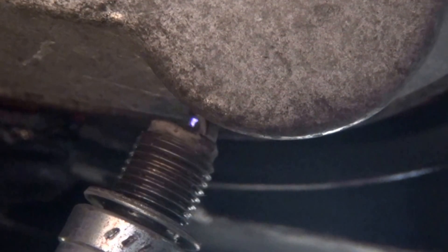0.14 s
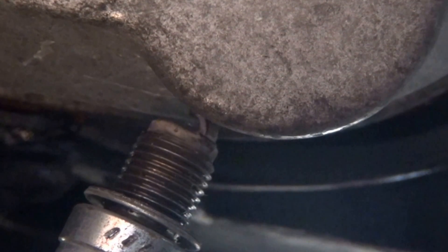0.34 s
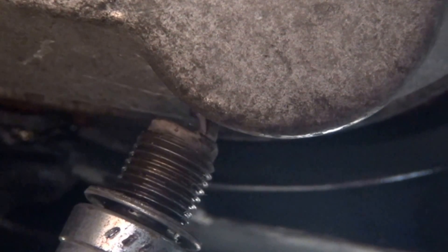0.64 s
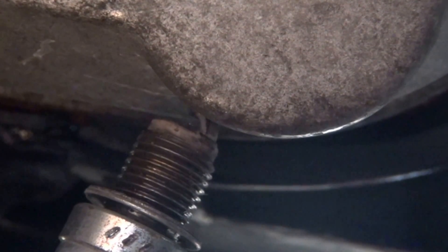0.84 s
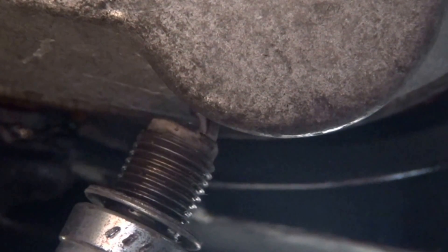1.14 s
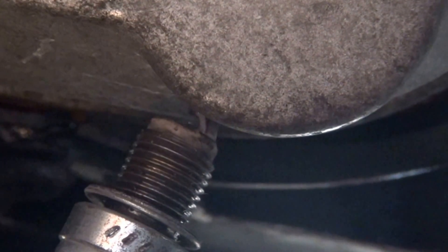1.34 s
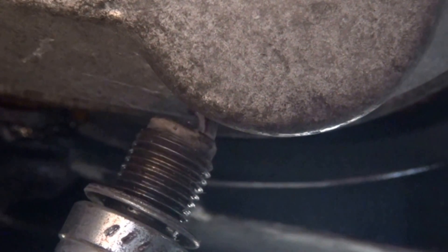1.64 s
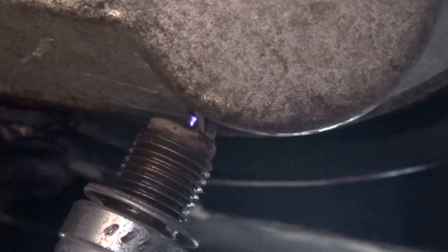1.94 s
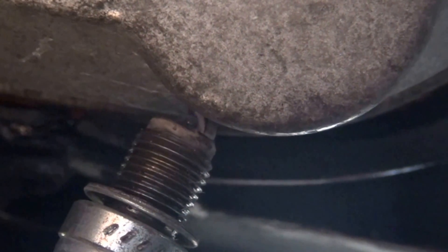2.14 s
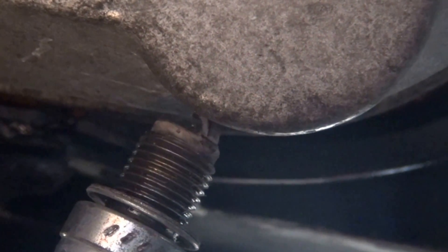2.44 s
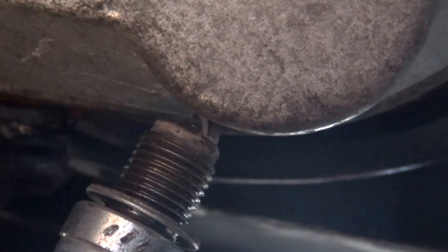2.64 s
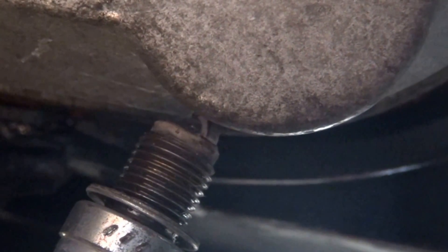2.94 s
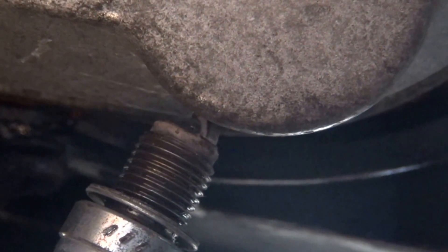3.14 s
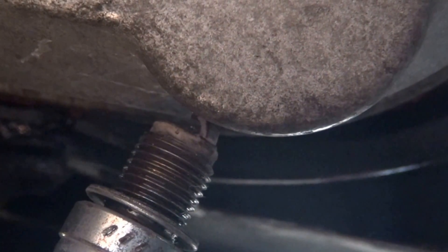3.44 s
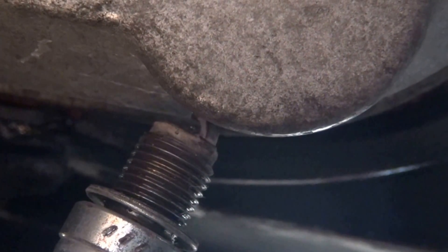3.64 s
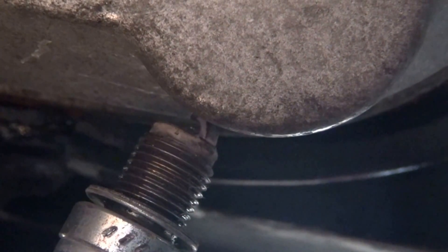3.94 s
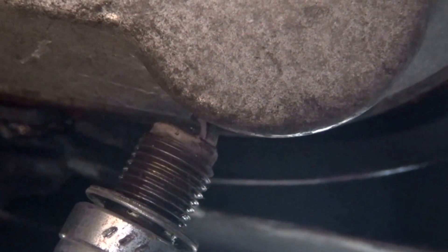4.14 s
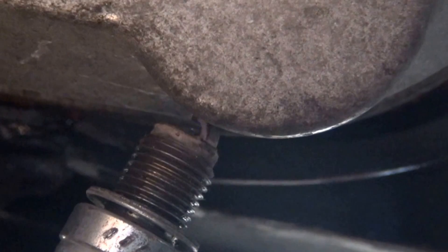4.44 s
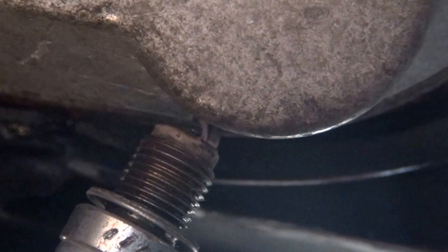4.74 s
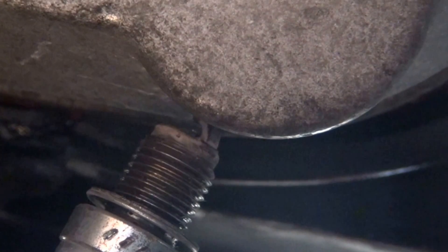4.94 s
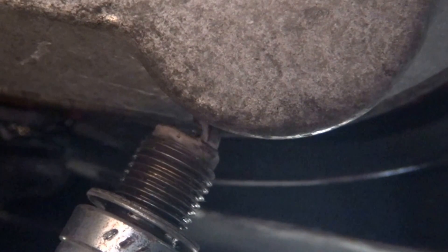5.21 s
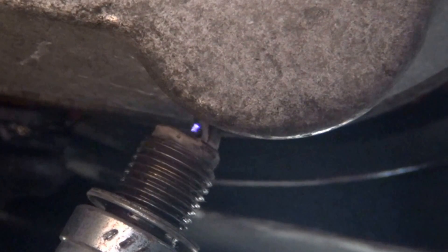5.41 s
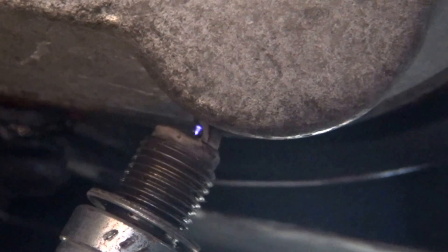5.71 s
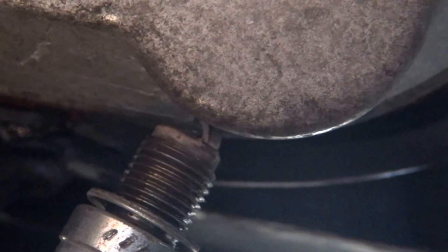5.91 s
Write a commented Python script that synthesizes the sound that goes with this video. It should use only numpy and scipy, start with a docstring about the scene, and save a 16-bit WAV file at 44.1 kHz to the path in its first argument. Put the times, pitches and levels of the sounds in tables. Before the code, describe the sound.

Close by, a starter motor whines up and grinds, an open cylinder puffs steadily, and loose gears clatter to rest, three times over faint distant traffic.

```python
"""An electric starter cranks a small engine with its spark plug out, three bursts, outdoors, close to the microphone.
Two gear meshes whine up to speed as sums of sine partials; noise knocks rattle the resonant metal casing.
Every second crank turn air chuffs from the cylinder: short puffs of sputtering, resonant noise.
After each release the loose gears clatter to rest with scrapes, squeals and ticks; behind lies distant
traffic, a dull noise roar with two low hums."""
import sys
import numpy as np
from scipy import signal
from scipy.fft import rfft, irfft
from scipy.io import wavfile
from scipy.ndimage import uniform_filter1d

SR = 44100
rng = np.random.default_rng(int(sys.argv[2]) if len(sys.argv) > 2 else 0)


def store_wav(level_fs):
    """Save 16-bit WAV to argv[1]."""
    pcm = np.round(np.clip(np.atleast_2d(level_fs), -1, 1) * 32767)
    wavfile.write(sys.argv[1], SR, pcm.T.astype(np.int16))


N = 267687  # length in samples

# Resonances of the metal casing. Each row: centre in Hz, width in Hz, height in dB before the caller's lift.
CASING_RESONANCES = [(810, 156, -0.5), (1245, 25, -1.5), (2086, 137, -1.5), (2645, 170, -1.5),
                     (3174, 95, -1.5), (3486, 47, 1), (3720, 43, -1), (4280, 100, -3), (4798, 143, 0),
                     (5210, 67, 1.5), (6750, 58, -6), (7220, 58, -1.5), (7720, 110, -3), (8310, 91, -0.5),
                     (9830, 100, -1), (10500, 55, -17), (10300, 45, 2.5), (11710, 86, -0.5),
                     (14000, 160, -8)]
# Air chuffs, one per two crank turns. Each row: start in seconds, level in dB before a common trim,
# centre in Hz.
AIR_CHUFFS = [(0.004, -16.5, 620), (0.165, -12.5, 1220), (0.345, -12.5, 720), (0.53, -14, 460),
              (0.699, -14.5, 786), (0.877, -13.5, 920), (1.117, -21, 730), (1.781, -11, 800),
              (1.963, -12, 770), (2.137, -12.5, 1220), (2.317, -13, 710), (2.496, -13, 790),
              (2.67, -9.5, 780), (4.362, -13, 786), (4.55, -16, 795), (4.722, -12.5, 735),
              (4.903, -12.5, 540), (5.083, -14.5, 720), (5.259, -12, 1140), (5.433, -13, 910),
              (5.607, -10.5, 794)]
# Colour of the free gears' low rattle, strongest around 1.5 kHz. Each row: frequency in Hz,
# gain in dB before scaling to rms 1.
LOOSE_GEAR_COLOUR = [(500, 2.5), (1500, 4), (3000, 1), (4000, 3)]


def undb(db):
    """Decibels to gain."""
    return 10 ** (np.asarray(db) / 20)


def unit(x):
    """Scale to rms 1."""
    return x / np.sqrt(np.mean(x ** 2))


def curves(tables, outside):
    """Columns of timed tables, sample by sample; the value outside holds between tables."""
    t = np.arange(N) / SR
    out = np.ones((len(outside), N)) * np.array(outside)[:, None]
    for table in tables:
        s, *columns = np.transpose(table)
        on = (t >= s[0]) & (t <= s[-1])
        out[:, on] = [np.interp(t[on], s, c) for c in columns]
    return out


def colour(x, points, modes=(), lift_db=0.):
    """Shape by (Hz, dB) points, with resonances standing above them."""
    f = np.arange(N // 2 + 1) * SR / N + 1  # 1 Hz up, so that the logarithm exists
    hz, db = np.transpose(points)
    gain = undb(np.interp(np.log(f), np.log(hz), db))
    ring = sum(undb(2 * (d + lift_db)) / (1 + (2 * (f - m) / w) ** 2) for m, w, d in modes)
    return irfft(rfft(x) * gain * np.sqrt(1 + ring), N)


def noise():
    """White noise."""
    return rng.standard_normal(N)


def walk(rate):
    """Random levels held 1 / rate s and slewed twice; rms 1."""
    k = int(SR / rate)
    steps = np.repeat(rng.standard_normal(N // k + 1), k)
    return unit(uniform_filter1d(uniform_filter1d(steps, k), k)[:N])


def treble(x, hz=5200):
    """The part of a sound above hz."""
    return signal.sosfiltfilt(signal.butter(3, hz, "high", fs=SR, output="sos"), x)


def hump(s, length, rise):
    """Start index and envelope of a burst that rises for a share of its length, then falls; both rounded."""
    u = np.linspace(0, 1, int(np.clip(length, .004, .1) * SR))
    a = np.clip(rise, .05, .9)
    return int(s * SR), np.sin(np.pi / 2 * np.minimum(u / a, (1 - u) / (1 - a))) ** 2


def add(track, i, burst):
    """Mix a burst into a track."""
    track[i:i + len(burst)] += burst[:N - i]


def starter():
    """Mesh pitch, share of speed still missing, drive on, coasting speed and throb, each 0-1 but the pitch."""
    # Starter bursts. Each row: button pressed, released and gears at rest in seconds,
    # full pinion mesh in Hz, throb sets in at seconds.
    bursts = [(-.225, .92, 1.375, 1962, .95), (1.586, 2.665, 3.11, 1950, 2.29),
              (4.122, 5.61, 6.04, 1957, 5.24)]
    engage_s = .014  # from the press to the first sound
    spin_up_s, creep_s, creep_share = .073, .5, .02  # fast gain of speed, then a slow last share
    t = np.arange(N) / SR
    hz, missing, on, coast, throb = np.zeros((5, N))
    for press, release, rest, top_hz, throb_s in bursts:
        held = (t >= press + engage_s) & (t < release)
        free = (t >= release) & (t < rest)
        u = t[held] - press
        missing[held] = (1 - creep_share) * np.exp(-u / spin_up_s) + creep_share * np.exp(-u / creep_s)
        hz[held] = top_hz * (1 - missing[held])
        on[held] = 1
        coast[free] = (rest - t[free]) / (rest - release)
        throb[held] = np.clip((t[held] - throb_s) / .05, 0, 1)
    return hz, missing, uniform_filter1d(on, size=300), coast, throb


def cycle():
    """Speed ripple (%), tooth load (dB) and, late in a burst, a throb (dB) of falling chirps four times a cycle."""
    # One four-stroke cycle from chuff to chuff. Each row: share of the cycle, speed ripple in %,
    # tooth load in dB before the throb and each sound reshape it.
    stroke_table = [(0, .9, -3), (.15, -.4, -2), (.23, .7, 1), (.54, -.1, 1), (.67, .2, -1.5),
                    (.8, -.6, 2.5), (.9, -.7, 0), (.95, -.3, -3.5), (1, .9, -3)]
    throbs_per_cycle, throb_peak_share = 4, .155
    throb_speed_pct, throb_peak_db = 1.4, 9  # the level is that of the sixth partial and above
    throb_unload = 1.5  # deeper load dips while the throb lasts
    s = np.transpose(AIR_CHUFFS)[0]
    count = np.cumsum(np.append(0, np.round(np.diff(s) / .178)))  # whole cycles of about .178 s
    share, speed, load_db = np.transpose(stroke_table)
    at = np.interp(np.arange(N) / SR, s, count) % 1
    throb = starter()[4]
    beat = 2 * np.pi * throbs_per_cycle * (at - throb_peak_share)
    load_db = np.interp(at, share, load_db)
    # the throb leaves only the dips near the chuff
    dips_db = np.minimum(load_db, 0) * (np.abs(at - .48) > .4)
    load_db = load_db * (1 - throb) + (1 + throb_unload) * throb * dips_db
    speed = np.interp(at, share, speed) - throb_speed_pct * throb * np.sin(beat)
    return speed, load_db, throb_peak_db * throb * np.cos(beat)


def whine(speed, load_db, throb_db):
    """Mesh tones, fluttering, and broken up while the motor gains speed; its shaft wobbles them once a turn."""
    # Partials of the two meshes. Each row: multiple of the mesh pitch, level in dB before the path
    # and overall gain, waver in dB.
    pinion = [(1, -1, 3.2), (2, -2.5, 3), (3, -2, 3), (4, -16.5, 2.5), (5, -16, 3.5), (6, -18.5, 4),
              (7, -23, 3)]
    ring_gear = [(1, -1, 4.5), (2, -2.5, 3.5), (4, -7.5, 3.5)]
    # How the casing passes the mesh tones on. Each row: frequency in Hz, gain in dB.
    whine_path = [(500, -12), (1200, -3), (1900, 0), (2700, 4), (3300, 4), (3900, -3), (4700, 0), (5300, 0),
                  (5850, -8), (6800, -8), (7750, 8), (8600, -4), (9800, 2), (11600, 7), (14000, 0)]
    ring_per_pinion, pinion_teeth = .3487, 9  # mesh pitch ratio; teeth per turn
    whine_db, surge_db = -25.5, 3  # gain at full speed; extra at standstill
    hz, missing, on = starter()[:3]
    jitter = .004 * walk(160) + .025 * np.sqrt(missing) * walk(60)
    phase = 2 * np.pi * np.cumsum(hz * (1 + speed / 100 + jitter)) / SR
    wobble = 1 + .25 * np.cos(phase / pinion_teeth)
    straining_db = 6 * np.sqrt(missing)
    out = 0
    for k, d, waver_db in pinion:
        flutter_db = waver_db * walk(150) + straining_db * walk(130)
        # higher partials feel the tooth load more
        feel_db = load_db * k * .35 + throb_db * min(k / 6, 1) ** 4
        out = out + undb(d + flutter_db + feel_db) * wobble * np.sin(k * phase)
    for k, d, waver_db in ring_gear:
        # the ring gear sings only near full speed, and breaks up in the throb
        rough = k * ring_per_pinion * phase + .4 * walk(250)
        level_db = d + waver_db * walk(150) - np.abs(throb_db) * .7
        out = out + (1 - missing) ** 5 * undb(level_db) * np.sin(rough)
    through_casing = colour(out, whine_path, CASING_RESONANCES, lift_db=5.)
    return on * undb(whine_db + surge_db * missing) * through_casing


def metal(grain_db, lift_db, coarse):
    """Knocks of uneven size, each about coarse samples long, ring the casing; lower and upper part."""
    # Colour of the casing. Each row: frequency in Hz, density in dB per Hz before scaling to rms 1.
    casing_colour = [(20, -20), (90, -22), (150, -7.5), (450, -6.5), (800, -7.5), (1100, -5), (2000, -2),
                     (3000, -3.5), (4200, -14.5), (6260, -26), (11700, -29.5), (15100, -43.5), (16000, -69)]
    size = np.repeat(rng.exponential(size=N // 8 + 1), 8)[:N]
    size = unit(uniform_filter1d(size, int(coarse)) - 1)
    x = colour(noise() * undb(grain_db * size), casing_colour, CASING_RESONANCES, lift_db)
    high = treble(x)
    return unit(x - high), unit(high)


def coasting_db(coast):
    """Level and treble of the free gears fall with their speed."""
    level_db = -25.5 + 14 * np.log10(coast + 1e-4)  # 14 dB lost per tenfold slowing
    treble_db = -9 - 15 * (1 - coast)
    return level_db, treble_db


def rattle(load_db, low_feel=0.043):
    """Driven teeth rasp with the tooth load, the treble most; coasting gears knock more coarsely."""
    rasp_db, surge_db = -22.5, 4.5  # gain at full speed; extra at standstill
    treble_db, dull_db = -5, -5.5  # treble at full speed; change at standstill
    missing, driven, coast = starter()[1:4]
    low, high = metal(grain_db=1.0, lift_db=9.0, coarse=55)
    flicker_db = .8 * walk(150)
    high_db = treble_db + dull_db * missing + load_db + flicker_db
    # the lower part answers dips in load more than rises
    low_db = low_feel * load_db * (0.5 - np.minimum(load_db, 0) / 2)
    rasp = low * undb(low_db) + high * undb(high_db)
    low, high = metal(grain_db=2.6, lift_db=6., coarse=90)
    db, high_db = coasting_db(coast)
    loose = undb(db) * (unit(colour(low, LOOSE_GEAR_COLOUR)) + high * undb(high_db))
    driven_rasp = driven * undb(rasp_db + surge_db * missing) * rasp
    return undb(.6 * walk(120)) * (driven_rasp + (1 - driven) * loose)


def clatter(fall=0.079):
    """Short scrapes of the free gears ring the casing hard; each squeals on a falling pitch."""
    # Scrapes of the loose gears. Each row: start in seconds, level in dB before a common trim,
    # length in seconds, middle pitch of the squeal in Hz.
    scrapes = [(0.936, -13, .024, 1950), (0.9726, -12.5, 0.033, 3030), (1.0084, -22, 0.024, 3000),
               (1.0344, -13.5, 0.047, 2620), (1.092, -25, 0.018, 3180), (1.252, -24, 0.011, 3060),
               (1.329, -22, 0.029, 1860), (2.69, -13.5, 0.041, 3520), (2.747, -13.5, 0.034, 2960),
               (2.7844, -13.5, 0.038, 2530), (2.837, -24, 0.028, 2670), (2.8616, -13, 0.036, 2650),
               (2.894, -25, 0.022, 2570), (3.077, -22, .027, 2690), (5.646, -17.5, 0.023, 2700),
               (5.659, -13, 0.034, 3050), (5.68, -17, 0.025, 2720), (5.71, -15.5, 0.04, 2500),
               (5.736, -20, 0.023, 2250), (5.7723, -22.5, 0.021, 2700), (5.799, -14.5, 0.029, 3217),
               (5.822, -13, 0.023, 1968), (5.887, -29, .038, 1760)]
    squeal_db, scrape_treble_db = -3, 4.5  # squeal gain; treble above that of the coasting rattle
    low, high = metal(grain_db=1.5, lift_db=12.5, coarse=124)
    low = unit(colour(low, LOOSE_GEAR_COLOUR))
    flutter = undb(4.5 * walk(400))
    out = np.zeros(N)
    high = high * undb(coasting_db(starter()[3])[1] + scrape_treble_db)
    for s, db, length, hz in scrapes:
        i, env = hump(s, length, rise=0.31)
        scrape = unit((low + high)[i:i + len(env)])
        glide = hz * (1 + fall * np.linspace(.5, -.5, len(env)))
        tone = np.sin(2 * np.pi * np.cumsum(glide) / SR)
        squeal = undb(squeal_db) * flutter[i:i + len(env)] * tone
        add(out, i, undb(db - 6.0) * env * (scrape + squeal))
    return out


def ticks():
    """Sharp metal ticks: a broad click with a few ms of ring."""
    # Each row: start in seconds, level in dB before a common lift.
    tick_table = [(0.9654, -34), (1.0044, -30), (1.1298, -37), (1.176, -33.5), (1.187, -45), (1.5884, -20),
                  (2.8194, -36), (2.8457, -31), (2.907, -37), (3.967, -50), (4.1277, -21), (5.7644, -34),
                  (5.8086, -34), (5.8915, -46)]
    out, t = np.zeros(N), np.arange(600) / SR
    chance = rng.standard_normal((len(tick_table), len(t)))
    for (s, db), hiss in zip(tick_table, chance):
        ring = signal.lfilter(*signal.iirpeak(4350, .8, fs=SR), hiss)  # centre in Hz, Q
        add(out, int(s * SR), undb(db + 4.5) * unit(ring) * np.exp(-t / 0.0038))
    return out


def chuffs(weak_db=-14.0, weak_hz=400):
    """Sputtering air pushed through the plug hole rings the cylinder; a weak, dull one follows a turn later."""
    # Resonances of the cylinder. Each row: centre in Hz, width in Hz, height in dB before a 5 dB lift.
    cylinder = [(458, 30, 4), (759, 20, 6), (914, 21, 0), (1220, 14, 5.5), (1574, 21, 3), (1954, 91, -21)]
    air_colour = [(80, -34), (220, -9), (500, -6), (1700, -5), (2500, -13), (4000, -30), (9000, -60)]
    sputter = noise() * undb(2.0 * walk(900))
    air = unit(colour(sputter, air_colour, cylinder, lift_db=5.))
    edge = unit(treble(air, hz=1260))
    out = np.zeros(N)
    next_starts = np.append(np.transpose(AIR_CHUFFS)[0][1:], 9)
    for (s, db, hz), next_s in zip(AIR_CHUFFS, next_starts):
        i, env = hump(s, length=0.054, rise=0.18)
        puff = air[i:i + len(env)]
        ring = signal.lfilter(*signal.iirpeak(hz, 3., fs=SR), puff)
        # the jet brightens as it speeds up
        jet = 0.1 * np.linspace(0, 1, len(env)) * edge[i:i + len(env)]
        add(out, i, undb(db - 2.5) * env * unit(puff + ring + jet))
        if next_s - s < .2:  # still cranking: the weak one falls halfway to the next chuff
            j, env = hump((s + next_s) / 2, 0.039, rise=0.39)
            dull = signal.lfilter(*signal.iirpeak(weak_hz, .9, fs=SR), air[j:j + len(env)])
            add(out, j, undb(db + weak_db) * env * unit(dull))
    return out


def hum(table):
    """A low tone wavering in level and pitch."""
    hz, db = curves([table], [100, -120])
    phase = 2 * np.pi * np.cumsum(hz * (1 + 0.023 * walk(11))) / SR
    return undb(db + 8.5 + 1.8 * walk(20)) * np.sin(phase)


def traffic():
    """Distant dull roar, slightly wide, with two hums; the deepest rumble differs on each microphone port."""
    # Loudness of the roar. Each row: time in seconds, level in dB.
    roar_level = [(0, -38.5), (1.5, -39), (3.2, -38.5), (4.1, -35.5), (6.07, -37.5)]
    # Colour of the roar. Each row: frequency in Hz, density in dB per Hz before scaling to rms 1.
    roar_colour = [(12, -57), (35, -24), (60, -9.5), (142, -3), (228, -3), (270, -8), (367, -10.5),
                   (485, -16), (873, -17), (1810, -26), (2020, -31), (3160, -36), (3950, -44),
                   (6720, -45.5), (16000, -59)]
    # Two low hums, one list each. Each row: time in seconds, pitch in Hz, level in dB before a common lift.
    hum_tables = [
        [(3.0, 148, -52), (3.3, 146.5, -46.5), (4.1, 140, -48), (4.3, 141, -61)],
        [(5.7, 102.6, -65), (5.85, 101, -46), (6.07, 96.5, -43.5)],
    ]
    side_colour = [(30, -13), (70, -8), (200, -18), (5000, -59)]
    rumble_colour = [(15, -21), (30, -21), (50, -5), (90, -39)]
    db, = curves([roar_level], [-37])
    mid, side = (unit(colour(noise(), roar_colour)) for _ in range(2))
    roar = mid + colour(side, side_colour) * np.array([[1], [-1]])
    rumble = np.array([unit(colour(noise(), rumble_colour)) for _ in range(2)])
    hums = sum(hum(table) for table in hum_tables)
    return undb(db + 1.0 * walk(5.35)) * roar + undb(-68) * rumble + hums


def scene():
    """Engine in the middle with a faint diffuse echo, traffic behind."""
    speed, load_db, throb_db = cycle()
    engine = whine(speed, load_db, throb_db) + rattle(load_db) + clatter() + chuffs() + ticks()
    t = np.arange(SR // 4) / SR
    tails = rng.standard_normal((2, len(t))) * np.exp(-np.log(1000) * t / 0.2)  # 60 dB down in .2 s
    tails = tails / np.sqrt(np.sum(tails ** 2, axis=1, keepdims=True))
    echo = np.array([signal.fftconvolve(engine, h)[:N] for h in tails])
    # the echo is passed most near 9 kHz, and differs left and right
    wide = [(500, -20.5), (2500, -18.5), (5000, -11.5), (9000, -4.0), (12000, -29)]
    return engine + np.array([colour(e, wide) for e in echo]) + traffic()


def record(dry):
    """The two microphone ports differ in colour; peaks round off; steep top cut."""
    # Each row: frequency in Hz, left minus right in dB.
    port_balance = [(25, -1), (50, -7), (110, -6), (200, -2), (380, 2), (700, 2.5), (1290, 3), (2380, 2.5),
                    (4400, 1), (8120, 1), (12000, 0)]
    top_hz = 15900
    hz, db = np.transpose(port_balance)
    x = np.array([colour(c, np.transpose([hz, side * db / 2])) for c, side in zip(dry, (1, -1))])
    x = np.tanh(x * 1.4) / 1.4
    return signal.sosfilt(signal.ellip(10, .2, 80, top_hz, fs=SR, output="sos"), x)


dry = scene()
out = record(dry)
store_wav(out)
```